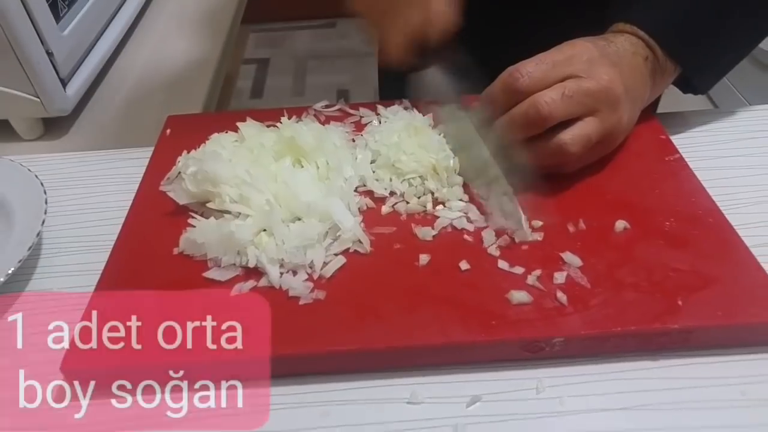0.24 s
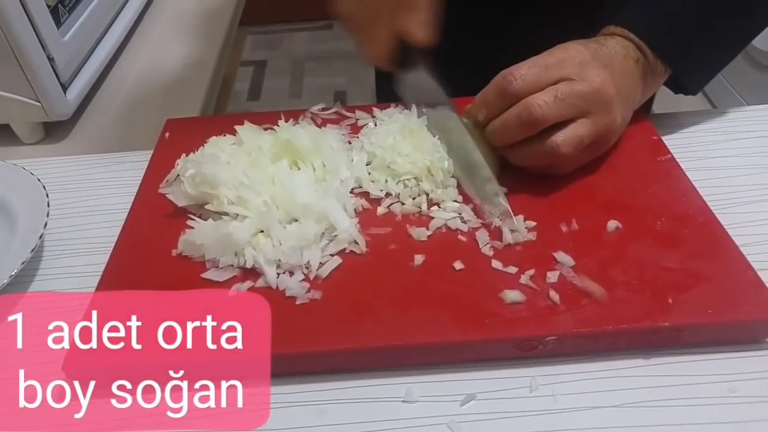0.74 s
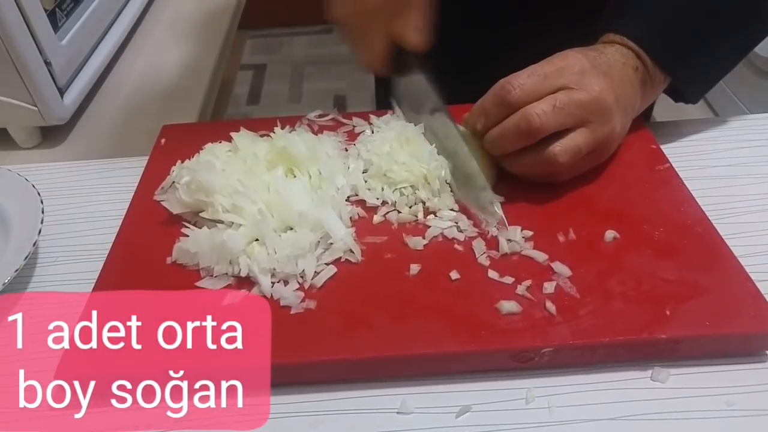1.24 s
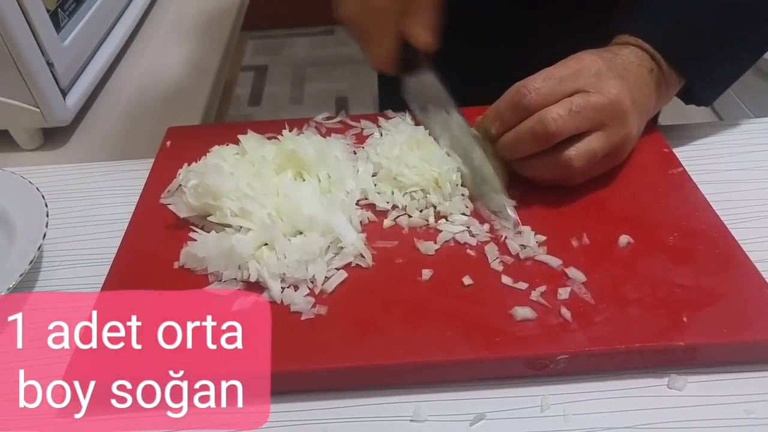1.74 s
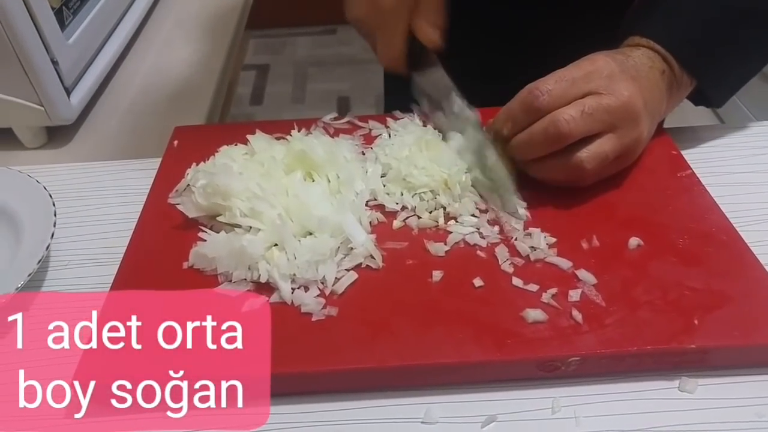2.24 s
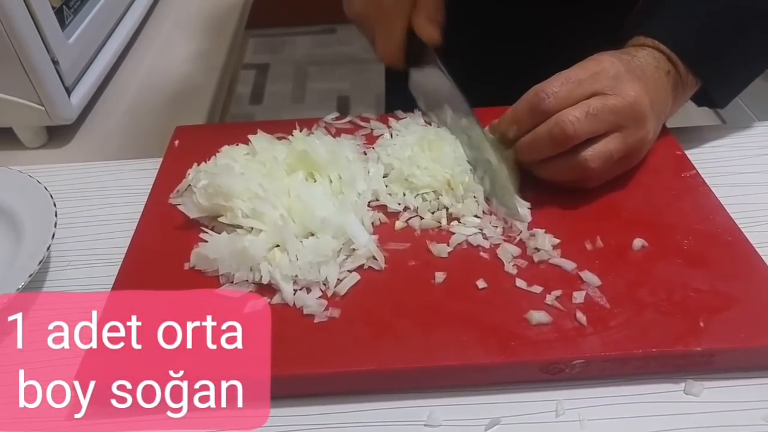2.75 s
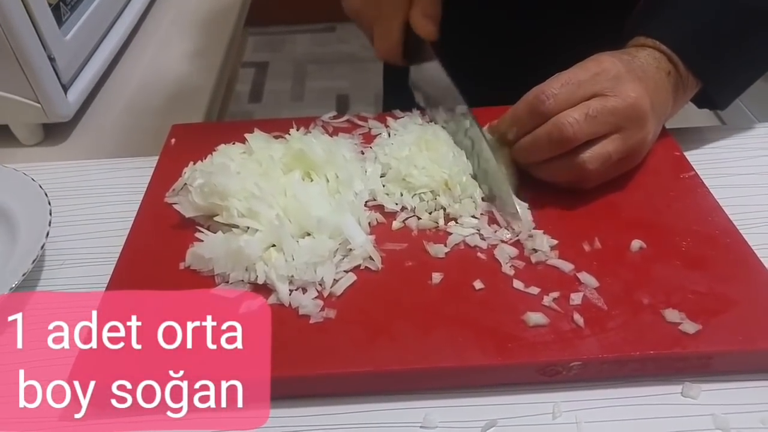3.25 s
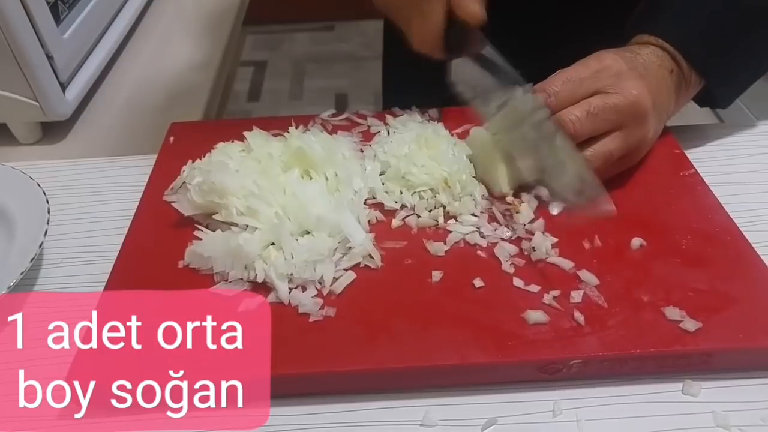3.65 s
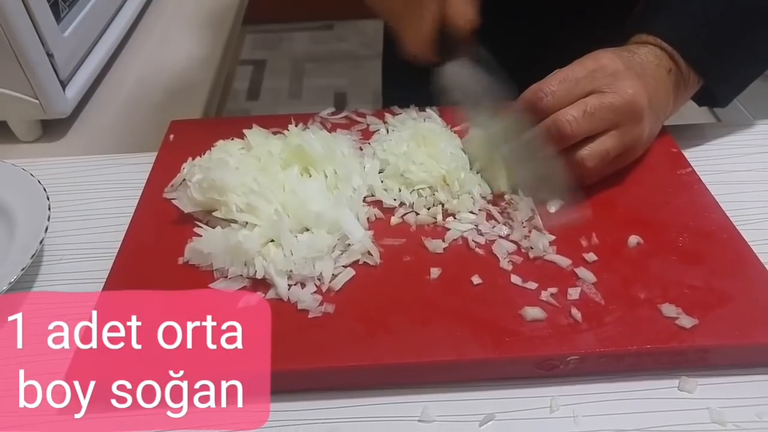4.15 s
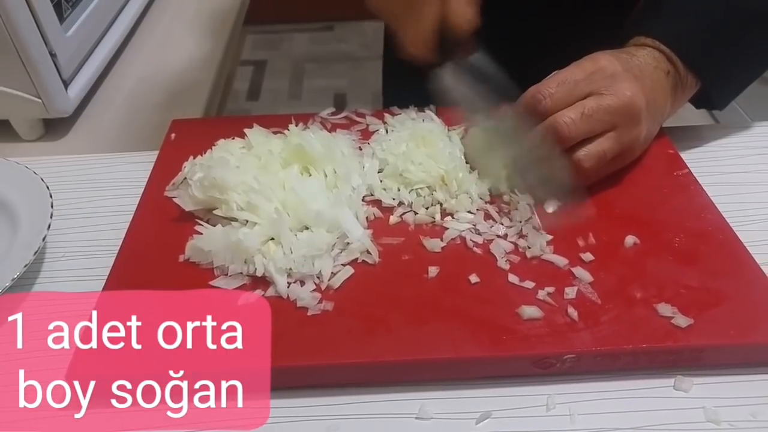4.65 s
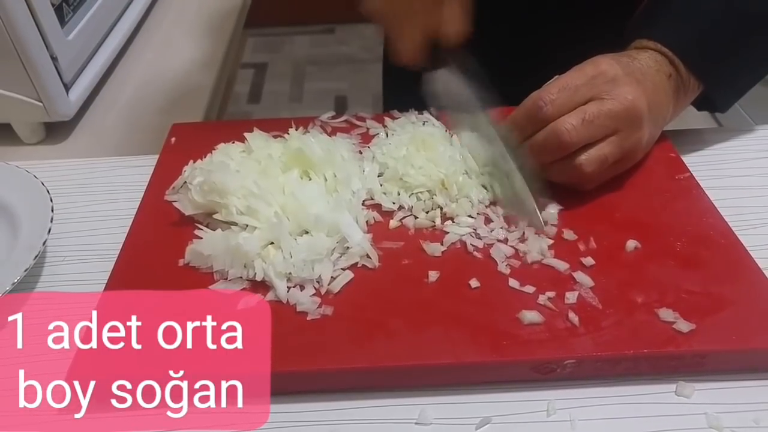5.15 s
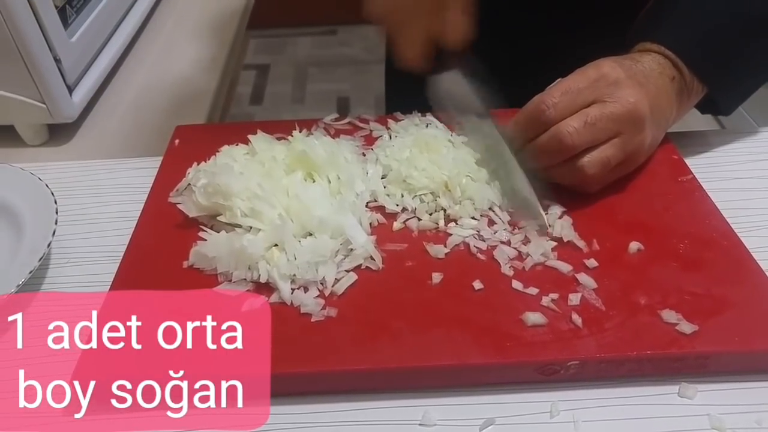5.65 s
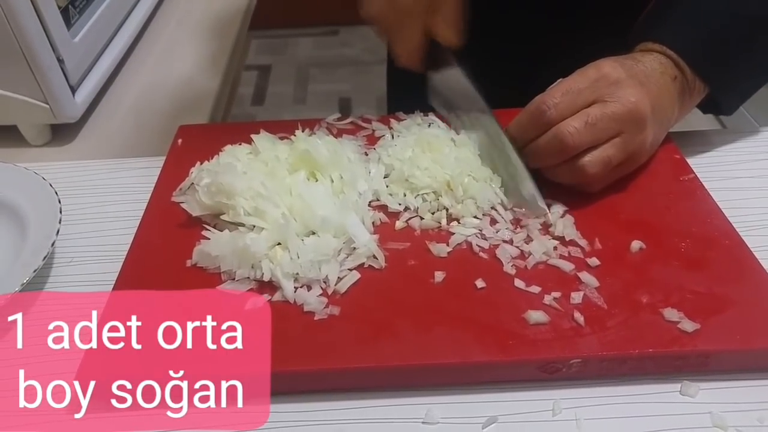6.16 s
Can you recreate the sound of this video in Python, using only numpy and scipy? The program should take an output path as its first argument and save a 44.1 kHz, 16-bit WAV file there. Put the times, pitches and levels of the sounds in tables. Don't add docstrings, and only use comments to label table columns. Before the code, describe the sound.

Silence until about 0.6 s, when a faint low appliance hum and the dying tail of an earlier knock fade in quickly. From 0.72 s a heavy kitchen knife chops onion on a thick plastic board, about one stroke every quarter second, nearly regular, reaching full level by about 1 s. Each knock is short, hard and hollow, strongest around 1 kHz, with a small steel-on-plastic crack and little deep bass. Until 1.6 s the strokes ring brighter with hardly any crunch; afterwards they are duller, each led by a light tap and a crisp, wet burst of onion cells. The thud is fullest around 3 to 4 s, and brightness slowly returns. The small hard kitchen answers each blow with quick reflections and a short ringing tail. A close phone microphone hears it in stereo. Chopping continues to the last knock near 6.36 s, just before the end.

```python
import sys
import numpy as np
from scipy import signal
from scipy.fft import rfft, irfft, next_fast_len
from scipy.io import wavfile
from scipy.ndimage import uniform_filter1d

SR = 44100
rng = np.random.default_rng(int(sys.argv[2]) if len(sys.argv) > 2 else 0)


def gain_from_decibels(decibels):
    exponent = np.asarray(decibels, float) / 20
    return 10 ** exponent


def wav_record(signal):
    frames = np.transpose(np.atleast_2d(signal))
    bounded = np.clip(frames, -1, 1)
    quanta = np.round(bounded * 32767).astype(np.int16)
    wavfile.write(sys.argv[1], SR, quanta)


N = 282681

# (frequency [Hz], density [dB per Hz])
HUM_SPECTRUM = [(25, -19), (90, -7.5), (165, -5.5), (300, -31), (800, -13.5), (2400, -28.5), (4300, -26),
                (4900, -18), (5600, -26.5), (6450, -23), (7700, -30.5), (11300, -33.5), (14500, -38),
                (16000, -55)]
HUM_DB = -50.5
MOTOR_HZ, MOTOR_WIDTH_HZ, MOTOR_DB = 161, 6.9, -51.5
# (frequency [Hz], correlation [0-1])
LIKENESS = [(60, 1), (130, 1), (290, 0.91), (640, 0.8), (1400, 0.14), (15000, 0.08)]

# (time [s], blow [dB], edge tone re blow [dB], crack re blow [dB])
EARLIER_KNOCK = [
    (0.471, -16, 0.5, -24),
]
# (time [s], blow [dB], edge tone re blow [dB], crack re blow [dB])
KNOCKS = [(0.7189, -16, -8.5, -10.5), (0.9523, -17.5, -1.5, -12), (1.2034, -16, 3.5, -8.5),
          (1.4536, -17, 0, -11.5), (1.7049, -18, -5, -9.5), (1.9493, -17, 1.5, -6.5),
          (2.1976, -17.5, -5, -6), (2.4375, -15.5, -2.5, -13), (2.682, -15.5, -2.5, -9.5),
          (2.9246, -14.5, -2, -8.4), (3.1742, -15.5, -7, -6.5), (3.4166, -16, -0.5, -9.5),
          (3.6558, -16.5, -4.5, -14), (3.9105, -14, -3.5, -9.5), (4.1503, -15, 0.5, -8),
          (4.3911, -14.5, -6.5, -11), (4.6429, -14.5, -4.5, -7.5), (4.89, -15.5, -6, -8),
          (5.1432, -16, -8, -11.5), (5.3775, -17, -6, -15.5), (5.6282, -16, 0.5, -9.5),
          (5.8759, -16.5, -5, -10.8), (6.1184, -17.5, -3, -13), (6.3647, -15, -7, -16)]
# (frequency [Hz], level [dB], t60 [s])
BOARD_MODES = [(107.4, -14, 0.073), (278, -19, 0.022), (478, -17, 0.037), (816, -2, 0.019), (955, 3, 0.012),
               (1127, 3.5, 0.021), (1272, 3.5, 0.021), (1443, -33, 0.0038), (1623, -10.5, 0.023)]
# (frequency [Hz], level [dB], t60 [s])
BLADE_MODES = [(2033, -2.5, 0.011), (2219, -2, 0.018), (2708, 0, 0.0041), (2839, -9.5, 0.0084),
               (3425, -17.5, 0.033), (4470, -6, 0.0048), (5744, -5.5, 0.0038)]
# (frequency [Hz], level [dB], t60 [s])
COUNTER_MODES = [(62.5, -21.5, 0.076)]
# (frequency [Hz], level [dB])
CRACK_SPECTRUM = [(800, -28), (2000, -22), (3500, 7), (5600, -2), (7600, -15), (8700, -12.5), (11000, -20),
                  (15000, -28)]
THUD_DB, THUD_DB_PER_S = -20, 0.8
THUD_PEAK_S, THUD_SPAN_S, THUD_PEAK_DB = 3.46, 0.59, 3.5
THIN_UNTIL_S, THIN_DB = 1.6, 10.5
DAMPED_DB, CLEAR_DB_PER_S = -6, 2.5

# (delay [ms], left [dB], right [dB], sign [+1 or -1])
REFLECTIONS = [(2.202, -40, -0.5, -1), (3.74, 0.5, 2, 1), (5.692, -1.5, -0.5, 1), (9.3, -3.5, -1, -1),
               (12.279, -4, -3, 1), (14.76, -35, -8, -1), (18.215, -31, -7, 1), (21.804, -1, 1.5, 1),
               (26.09, -7, -17, 1), (29.22, -32, -6.5, -1), (30.9, -34, -25.5, -1)]
# (frequency [Hz], t60 [s])
ROOM_T60 = [(100, 0.56), (300, 0.46), (800, 0.39), (2000, 0.38), (5000, 0.27), (12000, 0.24)]
# (frequency [Hz], level [dB])
TAIL_SPECTRUM = [(60, -20.5), (300, -1), (800, 2), (1500, -7.5), (2500, -5), (5000, -5), (8000, 6),
                 (15000, -7)]
# (frequency [Hz], level [dB], t60 [s])
ROOM_MODES = [(128.7, -15.5, 0.34), (409.2, -9.5, 0.27), (495.6, -6.5, 0.15), (611, -12, 0.052),
              (692.7, -8.5, 0.23), (751.5, -10.5, 0.45), (801.4, -8.5, 0.36), (876.7, -4, 0.23),
              (978, -8, 0.12), (1135, -10, 0.13), (1196, -10, 0.27), (1282, -8.5, 0.21), (1388, -5, 0.2),
              (2239, -13.5, 0.12)]

# (time [s], crunch at entry [dB], crunch at exit [dB])
CUTS = [(0.676, -71, -72), (1.436, -59.5, -64), (1.673, -48, -46), (1.916, -48, -49.5), (2.165, -46.5, -45),
        (2.406, -42, -51.5), (2.894, -39.5, -64), (3.145, -46, -43), (3.383, -43, -46), (3.624, -43.5, -43),
        (3.881, -44.5, -38), (4.117, -45.5, -43), (4.358, -44.5, -43), (4.617, -38, -52.5),
        (4.868, -51.5, -54.5), (5.109, -46, -38), (5.347, -41.5, -41.5), (5.6, -45, -36.5),
        (5.851, -43, -42.5), (6.088, -42.5, -38), (6.343, -32.5, -40)]
# (frequency [Hz], level [dB])
CRUNCH_SPECTRUM = [(300, -51), (1100, -25), (1800, -3), (3300, -5), (6000, -0.5), (7800, -9.5),
                   (12000, -12), (15000, -10.5)]
OVERRUN_S = 0.0028
TAP_DB, FIRM_DB, SOFT_SLOPE = -32.5, -45.5, 2.3

# (frequency [Hz], left minus right [dB])
DIRECT_SIDES = [(60, 4.5), (1000, 2.5), (2400, 0), (5000, -8), (9000, -4), (15000, 15)]
# (frequency [Hz], left minus right [dB])
ROOM_SIDES = [(60, 3), (400, -2), (1000, -0.5), (2500, -6), (5000, -3.5), (12000, -3)]
# (frequency [Hz], gain [dB])
MIC_RESPONSE = [(20, -22), (60, -4), (120, 0), (16000, 0.5)]
# (frequency [Hz], gain [dB])
BAND_EDGE = [(14800, 0), (15300, -3), (15800, -32), (16500, -48)]
# (frequency [Hz], threshold [dB])
TREBLE_THRESHOLD = [(4200, -85), (5000, -62), (7300, -64), (7800, -37), (8300, -63), (11000, -65),
                    (13000, -51), (15000, -42)]
# (time [s], level [dB])
FADE_IN = [
    (.608, -17),
    (.72, -6.5),
    (.95, 0.5),
    (1.2, 0),
]


def evened(x):
    return x / np.sqrt(np.mean(x ** 2) + 1e-20)


def read(points, hz):
    f, value = np.transpose(points)
    return np.interp(np.log(hz + 1), np.log(f + 1), value)


def add(mix, s, sound):
    part = mix[round(s * SR):][:len(sound)]
    part += sound[:len(part)]


def coloured(x, points, share=1):
    size = 2 * next_fast_len(x.shape[-1] // 2 + 2048)
    gain_db = share * read(points, np.fft.rfftfreq(size, 1 / SR))
    cepstrum = irfft(np.log(gain_from_decibels(gain_db)), size)[:size // 2]
    gain = np.exp(rfft(2 * cepstrum, size) - cepstrum[0])
    return irfft(rfft(x, size) * gain, size)[..., :x.shape[-1]]


def pair(hz, frames):
    a, b, c, d = rng.standard_normal((frames, len(hz), 4)).T
    same = np.clip(read(LIKENESS, hz), -1, 1)[:, None]
    left = a + 1j * b
    right = same * left + np.sqrt(1 - same ** 2) * (c + 1j * d)
    return np.array([left, right])


def hum():
    hz = np.fft.rfftfreq(1024, 1 / SR)
    z = pair(hz, N // 256 + 5) * gain_from_decibels(read(HUM_SPECTRUM, hz))[:, None]
    noise = signal.istft(z, nperseg=1024, noverlap=768)[1][:, :N]
    return gain_from_decibels(HUM_DB) * evened(noise)


def motor():
    hz = np.fft.rfftfreq(N, 1 / SR)
    band = 1 + ((hz - MOTOR_HZ) / MOTOR_WIDTH_HZ) ** 4
    return gain_from_decibels(MOTOR_DB) * evened(irfft(rfft(rng.standard_normal(N)) / band, N))


def knock(blow_db, edge_db, crack_db, thud_db, spray_db, luck, grit):
    hz, db, t60 = np.transpose(BOARD_MODES + BLADE_MODES + COUNTER_MODES)[:, :, None]
    t = np.arange(5000) / SR
    colour_db = read([(250, thud_db + 14.5), (420, 0), (1400, 0.032), (2000, edge_db + 8.0),
                      (2400, edge_db + 5.0), (3000, edge_db + spray_db + 8.0),
                      (3500, crack_db + spray_db - 4.0), (4400, crack_db + 8.0)], hz)
    spot_db = 1.5 * luck[0][:, None]
    struck_hz = hz * (1 + 0.024 * luck[1][:, None])
    body = gain_from_decibels(db + colour_db + spot_db - 60 * t / t60) * np.sin(2 * np.pi * struck_hz * t)
    body *= np.where(hz > 1500, (-1.) ** np.arange(len(hz))[:, None], 1)
    body = -body.sum(0) * (1 - np.exp(-t / 0.00017))
    fall = gain_from_decibels(-60 * t / 0.0067) + gain_from_decibels(-20.5 - 60 * t / 0.091)
    crack = coloured(np.pad(grit, (0, len(t) - len(grit))) * fall, CRACK_SPECTRUM)
    return gain_from_decibels(blow_db + 7) * (body + gain_from_decibels(crack_db + 6.5) * crack)


def kitchen():
    hz, t = np.fft.rfftfreq(256, 1 / SR), np.arange(500) * 64 / SR
    decay = gain_from_decibels(-60 * t / read(ROOM_T60, hz)[:, None])
    tail = signal.istft(pair(hz, len(t)) * decay, nperseg=256, noverlap=192)[1]
    tail = tail * np.clip((np.arange(tail.shape[1]) / SR - .004) / 0.0061, 0, 1)
    tail = coloured(tail / np.linalg.norm(tail[0]), TAIL_SPECTRUM) * gain_from_decibels([[1.5], [0]])
    early = np.zeros_like(tail)
    for ms, left_db, right_db, sign in REFLECTIONS:
        early[:, round(ms * SR / 1000)] += np.sign(sign) * gain_from_decibels([left_db, right_db])
    both = early.mean(0)
    differ = coloured((early[0] - early[1]) / 2, [(150, -72), (500, -33), (1200, 10.5)])
    early = np.array([both + differ, both - differ])
    return tail + coloured(early, [(80, -22), (300, -0.5), (1500, -7.5), (3000, -14),
                                   (6000, -10.5), (15000, -10.5)])


def rings():
    hz, db, t60 = np.transpose(ROOM_MODES)[:, :, None, None]
    t = np.arange(SR // 2) / SR
    scatter, skew = rng.random(hz.shape) - .5, rng.standard_normal(hz.shape)
    skew = np.array([[-.5], [.5]]) * skew * (0.02 + hz / 1800)
    swell = 1 - np.exp(-(t / 0.0019) ** 2)
    phase = 2 * np.pi * hz * (t - .0125) + 3.23 * scatter + skew
    return -gain_from_decibels(db - 60 * t / np.clip(t60, .05, .6)) * swell * np.cos(phase)


def crunch(length, entry_db, exit_db):
    t = np.arange(round(length * SR)) / SR
    snaps, push = rng.standard_normal((2, 3000))[:, :len(t)]
    burst_db = 2.2 * rng.exponential(1, 3000)[:len(t)]
    snaps = evened(snaps * gain_from_decibels(burst_db)) * np.minimum(t / 0.0019, 1)
    snaps = coloured(snaps * gain_from_decibels(entry_db + (exit_db - entry_db) * t / length), CRUNCH_SPECTRUM)
    tap_db = TAP_DB + SOFT_SLOPE * min(entry_db - FIRM_DB, 0)
    push = push * gain_from_decibels(tap_db + 11.0 - 60 * t / 0.12) * np.minimum(t / 0.00038, 1)
    tap = coloured(push, [(600, -14.5), (1000, 2), (1350, -4.5), (1700, -12.5), (2300, -16.0), (3000, -67)])
    return gain_from_decibels(7.5) * snaps + tap


def gate(x):
    hz, t, z = signal.stft(x, SR, nperseg=1536, noverlap=1152)
    power = abs(z) ** 2
    level_db = 10 * np.log10(uniform_filter1d(power, size=2, axis=1) + 1e-20)
    frame_db = 10 * np.log10(power.sum((0, 1)) + 1e-20)
    patches = uniform_filter1d(rng.standard_normal(z.shape[1:]), size=16, axis=0)
    patches = evened(uniform_filter1d(patches, size=4, axis=1))
    limit_db = read(TREBLE_THRESHOLD, hz)[:, None] - 22 + 0.48 * frame_db + 16.5 * patches
    kept = z * gain_from_decibels(np.clip(8 * (level_db - limit_db), -50, 0))
    return signal.istft(kept, nperseg=1536, noverlap=1152)[1][:, :N]


def scene():
    board, ringing = np.zeros(N), np.zeros((N, 2))
    room, modes, floor = kitchen(), rings(), hum()
    luck, grit = rng.standard_normal((40, 3, 25)), rng.standard_normal((40, 3000))
    struck = len(BOARD_MODES + BLADE_MODES + COUNTER_MODES)
    for (s, *levels), chance, rough in zip(EARLIER_KNOCK + KNOCKS, luck, grit):
        spray_db = THIN_DB if s < THIN_UNTIL_S else DAMPED_DB + CLEAR_DB_PER_S * (s - THIN_UNTIL_S)
        heaviest = np.exp(-((s - THUD_PEAK_S) / THUD_SPAN_S) ** 2)
        thud_db = THUD_DB + THUD_DB_PER_S * s + THUD_PEAK_DB * heaviest
        add(board, s, knock(*levels, thud_db, spray_db, chance[:, :struck], rough))
        mode_gain = gain_from_decibels(levels[0] + 3.5 + 1.75 * chance[2, :len(ROOM_MODES)])
        add(ringing, s, np.tensordot(mode_gain, modes, axes=1).T)
    for s, *cut in CUTS:
        lands = min(row[0] for row in KNOCKS if row[0] > s)
        add(board, s, crunch(np.clip(lands - s + OVERRUN_S, .01, .065), *cut))
    direct = np.array([coloured(np.roll(board, 1), DIRECT_SIDES, 0.25), coloured(board, DIRECT_SIDES, -1.01)])
    far = signal.oaconvolve(board[None], room, axes=1)[:, :N] + ringing.T
    far = np.array([coloured(far[0], ROOM_SIDES, 0.87), coloured(far[1], ROOM_SIDES, -0.38)])
    return direct + far + floor + motor()


def top_cut(x):
    return signal.sosfilt(signal.butter(12, 16460, fs=SR, output="sos"), x)


def record(dry):
    t = np.arange(N) / SR
    fade = gain_from_decibels(np.interp(t, *np.transpose(FADE_IN))) * np.clip((t - FADE_IN[0][0]) / 0.003, 0, 1)
    overloaded = 0.91 * np.tanh(coloured(dry, MIC_RESPONSE) / 0.87)
    heard = gate(coloured(overloaded, BAND_EDGE))
    return top_cut(fade * heard)


dry = scene()
out = record(dry)
wav_record(out)
```